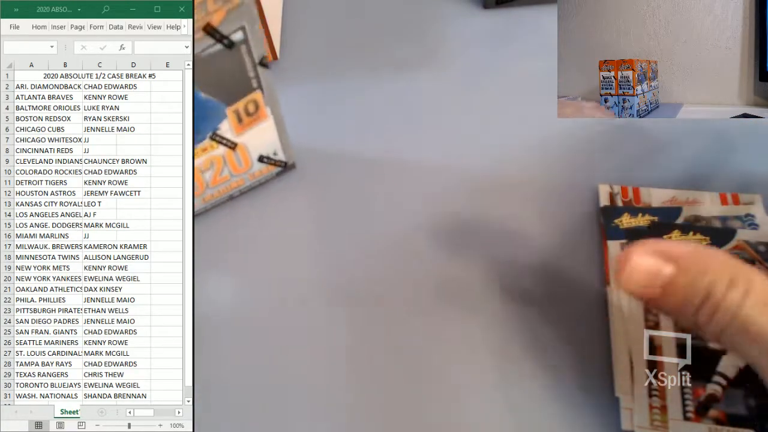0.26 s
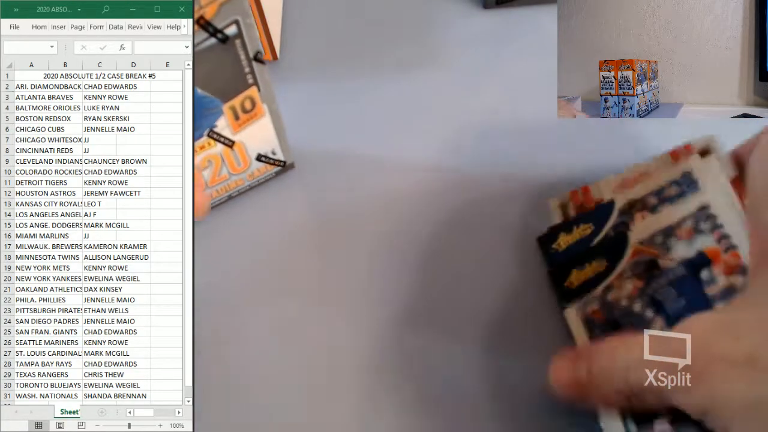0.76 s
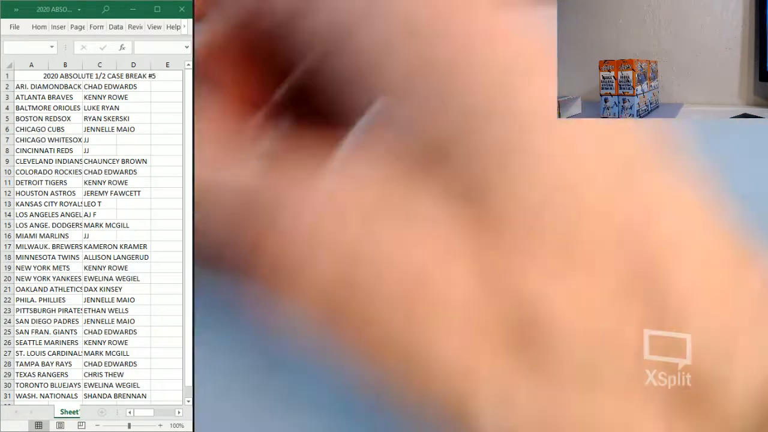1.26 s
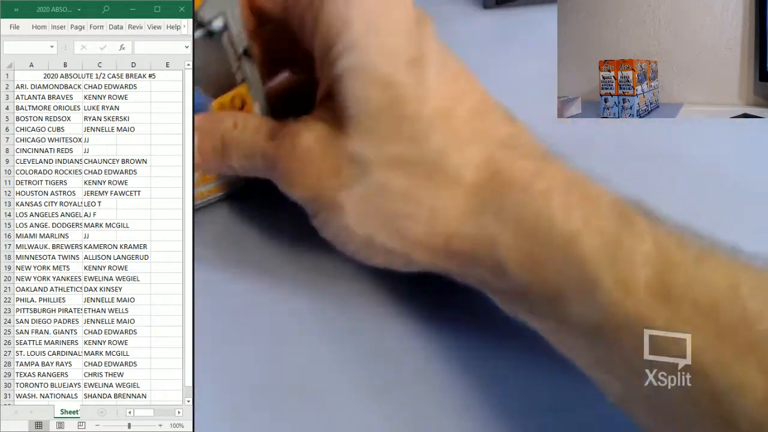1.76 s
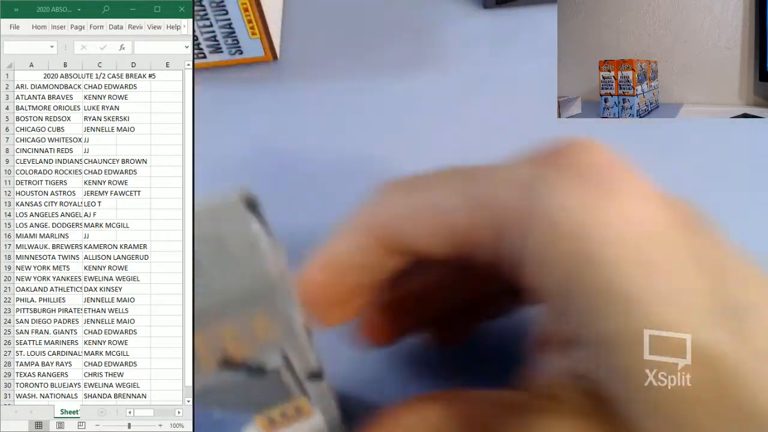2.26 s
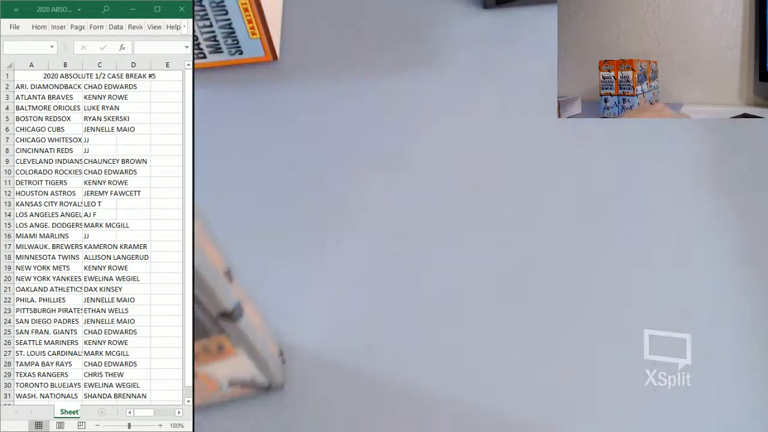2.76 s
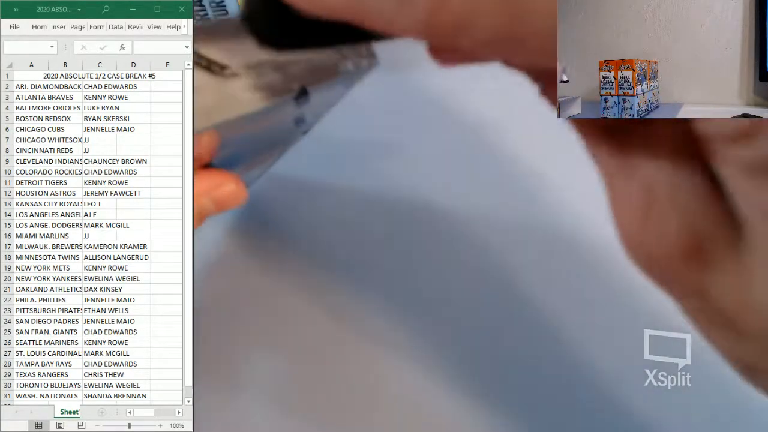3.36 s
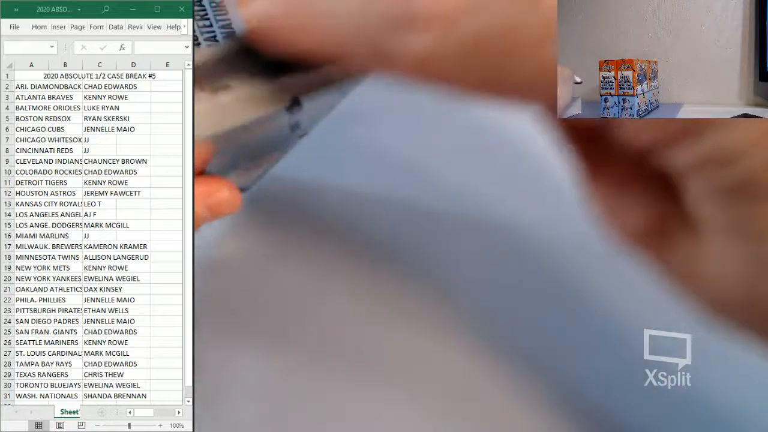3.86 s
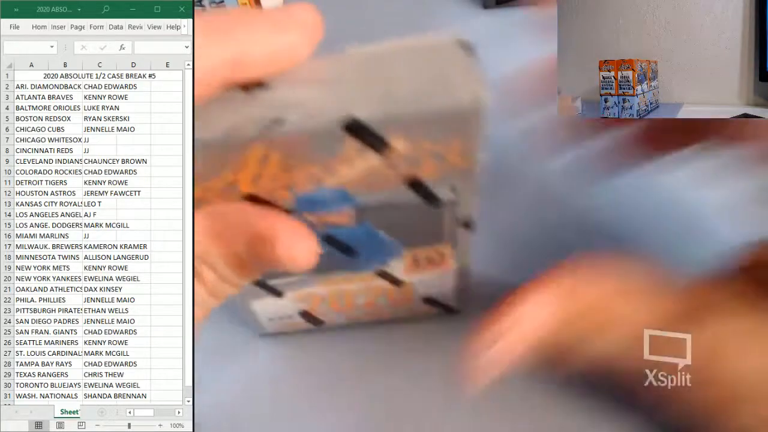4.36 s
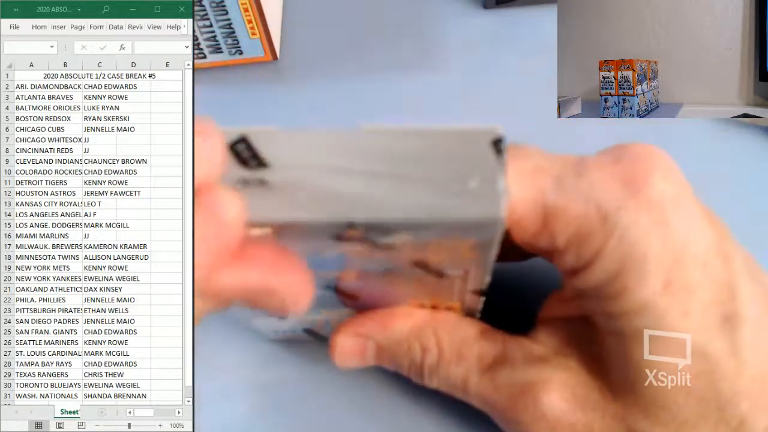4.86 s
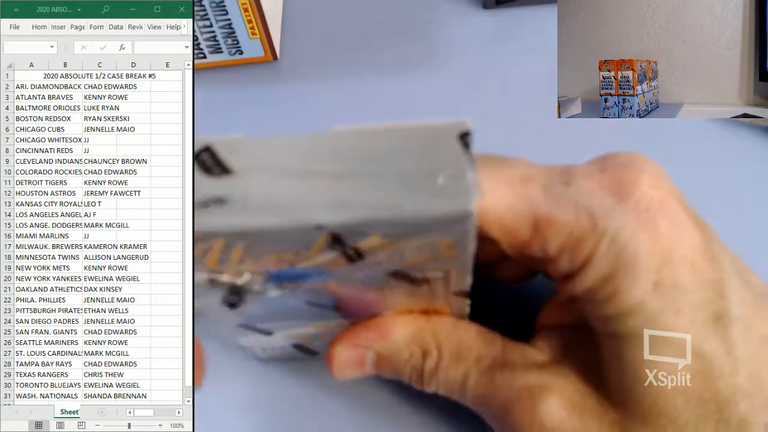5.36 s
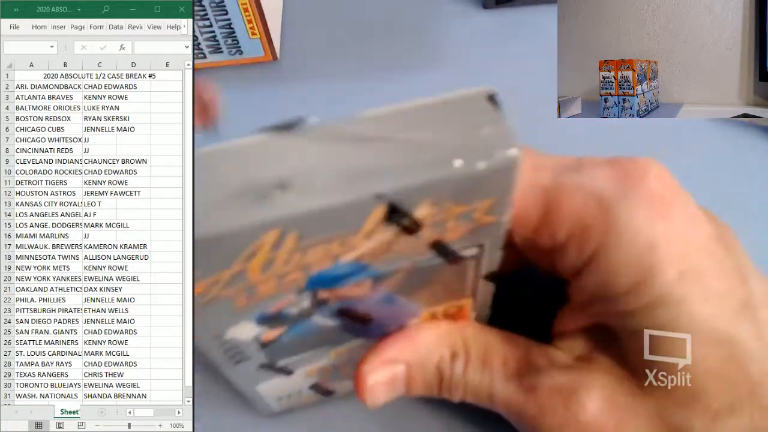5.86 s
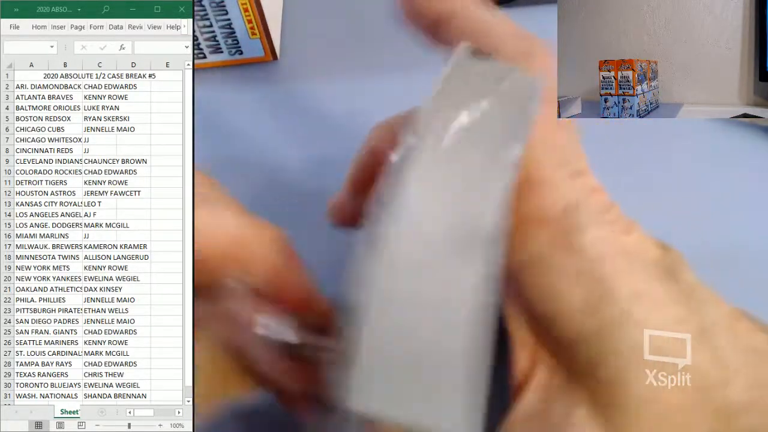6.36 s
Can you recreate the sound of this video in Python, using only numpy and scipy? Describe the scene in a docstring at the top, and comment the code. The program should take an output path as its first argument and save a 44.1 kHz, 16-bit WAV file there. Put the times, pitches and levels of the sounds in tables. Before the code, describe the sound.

Cards slide off a desk, then a small film-wrapped box is dragged, knocked hard once and turned with crinkly clicks over low fan noise.

```python
"""A desk in a small furnished room: hands slide a stack of cards off its top, then drag, knock and turn
a small film-wrapped cardboard box. Fan noise and mains hum lie behind. Knocks and stick-slip noise ring
the modes of the desk and box, sliding edges sing, and shaped noise bursts make the film click and rustle.
A narrow-band webcam microphone stands on the same desk and overloads on the hardest knock."""
import sys
import numpy as np
from scipy import signal
from scipy.fft import rfft, irfft
from scipy.io import wavfile
from scipy.ndimage import uniform_filter1d

SR = 44100
rng = np.random.default_rng(int(sys.argv[2]) if len(sys.argv) > 2 else 0)


def unload_wav(signal):
    """Save mono or channel-first audio to the path in sys.argv[1] as 16-bit WAV at rate SR, clipped to [-1, 1]."""
    wavfile.write(
        sys.argv[1],
        SR,
        np.round(np.clip(np.atleast_2d(signal).T, -1, 1) * 32767).astype(np.int16),
    )


def gain_from_decibels(decibels):
    """Convert decibel values to linear amplitude factors."""
    exponent = np.asarray(decibels, float) / 20
    return 10 ** exponent


N = 291501  # length in samples


def unit(x):
    """Scales a sound to rms 1."""
    return x / np.sqrt(np.mean(x ** 2))


def band(x, hz, width_hz):
    """Two-pole resonance, gain 1 at the centre."""
    return signal.lfilter(*signal.iirpeak(hz, hz / width_hz, fs=SR), x)


def colour(x, points):
    """Shapes a spectrum by (Hz, dB) points, joined straight over log frequency."""
    hz, db = np.transpose(points)
    f = np.maximum(np.fft.rfftfreq(len(x), 1 / SR), 1)
    return irfft(rfft(x) * gain_from_decibels(np.interp(np.log(f), np.log(hz), db)), len(x))


def walk(rate):
    """Random levels, each held for 1 / rate seconds and slewed twice; rms 1."""
    hold = int(SR / rate)
    levels = np.repeat(rng.standard_normal(N // hold + 1), hold)
    return unit(uniform_filter1d(uniform_filter1d(levels, hold), hold)[:N])


def grit(rate, scatter_db, smooth):
    """Slips at random moments, rate per second, with a long-tailed size, over an even hiss."""
    chance = rng.random((2, N))
    size = gain_from_decibels(-scatter_db * np.log(1 - chance[1])) * rng.standard_normal(N)
    slips = (chance[0] < rate / SR) * size
    return unit(unit(slips) + smooth * rng.standard_normal(N))


def add(out, s, peak_db, sound):
    """Lays a sound in at time s with the given peak."""
    i = int(s * SR)
    out[i:i + len(sound)] += (sound * gain_from_decibels(peak_db) / np.abs(sound).max())[:N - i]


# Spectrum of the fan noise in the room. Each row: frequency in Hz, relative level in dB per Hz.
AIR_SPECTRUM = [(12, -52.5), (20, 6), (120, -3.5), (185, -1.5), (239, 2.5), (300, -8.5), (430, -9.5),
                (555, -24), (615, -14.5), (2320, -30), (5540, -32), (7720, -37.5), (9000, -35.5),
                (11700, -100), (19800, -120)]
# Mains hum. Each row: frequency in Hz, middle level in dB rms.
HUM_TONES = [(59.2, -57), (118.4, -54.5), (242.2, -73)]


def room_tone():
    """Fan noise that drifts a little in level, and a mains hum that wavers."""
    t = np.arange(N) / SR
    air = unit(colour(rng.standard_normal(N), AIR_SPECTRUM)) * gain_from_decibels(-54 + 0.87 * walk(25))
    hum = np.zeros(N)
    for hz, db in HUM_TONES:
        hum += np.sqrt(2) * gain_from_decibels(db + 1.4 * walk(56)) * np.sin(2 * np.pi * hz * t)
    return air + hum


def sampling_tone():
    """A faint 8 kHz tone gated in quick beats with softened edges, left by sampling at 16 kHz."""
    t = np.arange(N) / SR
    beats_per_s, on_share = 30, 0.33
    gate = uniform_filter1d(1. * (t * beats_per_s % 1 < on_share), size=100)
    return np.sqrt(2) * gain_from_decibels(-84) * np.sin(2 * np.pi * 8000 * t) * gate


# Thin bright ticks that bypass the microphone's treble limit. Each row: start in seconds, peak in dB.
BRIGHT_TICKS = [(4.189, -39), (4.8247, -40), (5.102, -43), (5.3273, -27)]


def ticks():
    """Each tick is one impulse through three broad resonances between 5.5 and 5.7 kHz."""
    out = np.zeros(N)
    impulse = 1. * (np.arange(SR // 200) == 0)
    spike = band(band(band(impulse, 5700, 3000), 5500, 4050), 5700, 6000)
    for s, peak_db in BRIGHT_TICKS:
        add(out, s, peak_db, spike)
    return out


# Strokes of the hand across the desk. Each row: start in seconds, length in seconds, desk drag in dB,
# card scrape in dB, scrape centre in Hz, film rustle in dB; levels are at full speed, before settling.
HAND_STROKES = [(-.06, 0.07, -41.5, -42, 950, -52.5), (0.02, 0.2, -56, -69, 1476, -63),
                (0.259, 0.088, -34.5, -43, 890, -52.5), (0.318, 0.16, -32, -48, 860, -59.5),
                (0.455, 0.13, -49.5, -51, 1117, -64.5), (0.556, 0.24, -54.5, -55.5, 1300, -61.5),
                (0.98, 0.3, -77, -70, 1210, -67.5), (1.389, 0.16, -47.5, -65.5, 822, -70),
                (1.582, 0.13, -53.5, -59.5, 1000, -67.5), (1.913, 0.2, -57, -65.5, 1180, -64),
                (2.036, 0.25, -45, -55.5, 1250, -68), (2.211, 0.22, -47, -50.5, 1000, -64.5),
                (2.4, 0.32, -54.5, -61, 1100, -60), (2.627, 0.028, -32, -64.5, 1536, -32),
                (2.67, 0.18, -45, -51.5, 1014, -63), (2.775, 0.2, -42, -52.5, 727, -69),
                (3.019, 0.078, -46, -60.5, 897, -65), (3.306, .16, -39, -39.5, 1250, -43),
                (3.711, 0.12, -44, -39, 1100, -42.5), (3.733, 0.14, -37, -42, 1547, -37),
                (3.898, 0.047, -40, -40, 1255, -67), (4.046, 0.12, -22.5, -30.5, 1200, -46.5),
                (4.079, 0.18, -33, -41.5, 988, -65), (4.247, 0.33, -53.5, -59, 1100, -62.5),
                (4.545, 0.2, -52, -61, 1544, -63), (4.685, 0.45, -57.5, -63, 1100, -69.5),
                (4.978, 0.63, -71, -64, 1100, -62.5), (5.261, 0.072, -42, -44, 1220, -40),
                (5.352, 0.077, -36, -38.5, 790, -43.5), (5.474, 0.093, -37.5, -46, 930, -50.5),
                (5.576, 0.039, -37.5, -36.5, 1100, -38), (5.666, 0.11, -50, -49.5, 1000, -57),
                (5.761, 0.16, -50.5, -54.5, 1218, -50.5), (5.98, 0.16, -52, -60, 807, -65),
                (6.146, 0.33, -46, -50, 960, -55), (6.281, 0.053, -40, -44, 892, -62),
                (6.373, 0.57, -53, -56, 1200, -55.5)]
# Levels while the hands only hold: drag, scrape and film, each in dB.
HOLD_DB = [-61.5, -70.5, -86.5]


def strokes():
    """Hand speed follows a half sine over each stroke; every layer follows it and settles after."""
    speed_power = 0.87  # amplitude against hand speed
    settle_s = 0.014
    rest_hz = 1100  # scrape centre while the hands rest
    t = np.arange(N) / SR
    power = gain_from_decibels(np.array(HOLD_DB))[:, None] ** 2 * np.ones(N)
    # the fourth row is the scrape centre in octaves, weighted by scrape power
    power = np.vstack([power, power[1] * np.log2(rest_hz)])
    for s, length, drag_db, scrape_db, hz, film_db in HAND_STROKES:
        i, j = max(int(s * SR), 0), min(int((s + length) * SR), N)
        speed = np.abs(np.sin(np.pi * (t[i:j] - s) / length))
        full = gain_from_decibels(np.array([drag_db, scrape_db, film_db]))[:, None]
        own = (full * speed ** speed_power) ** 2
        power[:, i:j] += np.vstack([own, own[1] * np.log2(hz)])
    keep = np.exp(-1 / (settle_s * SR))
    power = signal.lfilter([1 - keep], [1, -keep], power, zi=keep * power[:, :1])[0]
    drag_db, scrape_db, film_db = 10 * np.log10(power[:3])
    # where strokes overlap the louder one weighs more on the centre
    return drag_db, scrape_db, film_db, power[3] / power[1]


# Modes of the desk top and box, rung by both rubbing and knocks.
# Each row: frequency in Hz, base level in dB, base decay time (t60) in seconds.
DESK_MODES = [(43.6, -1, 0.37), (68.5, 2.5, 0.17), (122.4, 3.5, 0.18), (199.7, 7, 0.053), (195, -9, 0.022),
              (227.6, -11, 0.96), (316, -2, 0.11), (353.4, 0, 0.14), (430, 6, 0.063), (504, -2.5, 0.14),
              (590, -1, 0.05), (668, 4.5, 0.027), (813, -1, 0.024), (885, 1, 0.029), (1000, -9.5, 0.022),
              (1085, -8.5, 0.058), (1140, -19.5, 0.076), (1392, -0.5, 0.013), (1520, -21, 0.11),
              (1900, -37.5, 0.19)]
# Spectrum of the rustling film. Each row: frequency in Hz, relative level in dB per Hz.
FILM_SPECTRUM = [(1290, -14), (2200, 0), (3010, -1), (3940, -1.5), (4210, -4), (6140, -3.5), (7860, -16),
                 (9000, -4.5), (11700, -68), (19800, -120)]


def rubbing():
    """Stick-slip drives the desk: drags its low modes, card edges the upper ones; film rustles on top."""
    drag_db, scrape_db, film_db, centre_octave = strokes()
    drag_slips, scrape_slips, film_slips = grit(2000, 1.5, .8), grit(1500, 1.5, .8), grit(1200, 2.5, .8)
    edge_hz = 560  # drags ring the modes below, card edges those above
    wander_db = 2.2
    low_ring, high_ring = np.zeros(N), np.zeros(N)
    for hz, db, t60 in DESK_MODES:
        # the contact wanders, so each mode swells and fades by itself
        level = gain_from_decibels(db + wander_db * walk(24))
        width_hz = 1.16 * np.log(1000) / np.pi / t60
        if hz > edge_hz:
            high_ring += level * band(scrape_slips, hz, width_hz)
        else:
            low_ring += level * band(drag_slips, hz, width_hz)
    # a soft, broad contact carries no treble into the wood
    drag = band(band(low_ring, 420, 740), 260, 660)
    wood = unit(high_ring) + gain_from_decibels(-19.5) * unit(band(scrape_slips, 1000, 900))
    # a flat face slides dull, an edge bright: each stroke favours the modes near its centre
    scrape = np.zeros(N)
    for hz in 500 * 2 ** np.arange(0, 2.6, 1 / 3):
        near = gain_from_decibels(-15 * (np.log2(hz) - centre_octave) ** 2)  # 15 dB down one octave away
        scrape += near * band(band(wood, hz, hz / 3), hz, hz / 3)
    rustle = colour(film_slips, FILM_SPECTRUM) * gain_from_decibels(wander_db * walk(65))
    # creases come and go, so the colour of the film is patchy
    film = np.zeros(N)
    for hz in 1500 * 2 ** np.arange(0, 2.8, 1 / 3):
        film += gain_from_decibels(wander_db * walk(45)) * band(band(rustle, hz, hz / 2), hz, hz / 2)
    return gain_from_decibels(drag_db) * unit(drag) + gain_from_decibels(scrape_db) * unit(scrape) + gain_from_decibels(film_db) * unit(film)


# Narrow resonances that sing while an edge slides. Each row: start in seconds, length in seconds,
# first pitch in Hz, last pitch in Hz, level in dB rms before the swell and fade.
SINGING_EDGES = [(0.269, 0.11, 433.6, 430, -33), (.28, 0.15, 1080, 1035, -42),
                 (0.481, .08, 1100, 1000, -48.5), (2.744, 0.22, 610, 745, -49),
                 (3.315, 0.14, 6440, 7100, -50.5), (3.354, .1, 1350, 1467, -39),
                 (3.739, 0.092, 5820, 6220, -43.5), (3.77, 0.04, 3920, 3900, -53),
                 (3.749, .08, 1552, 1579, -36.5), (3.892, 0.077, 1000, 784, -42.5),
                 (4.09, 0.055, 3925, 3810, -39)]


def sings():
    """Narrow noise on a gliding pitch, swelling and fading over the slide."""
    width = 0.031  # bandwidth as a share of the first pitch
    out = np.zeros(N)
    noises = rng.standard_normal((len(SINGING_EDGES), 2, SR // 3))
    for (s, length, first_hz, last_hz, db), noise in zip(SINGING_EDGES, noises):
        n, i = int(length * SR), int(s * SR)
        lowpass = signal.butter(1, width * first_hz / 2, fs=SR)
        slow = signal.lfilter(*lowpass, noise[0] + 1j * noise[1])[-n:]
        phase = 2 * np.pi * np.cumsum(np.linspace(first_hz, last_hz, n)) / SR
        tone = unit((slow * np.exp(1j * phase)).real)
        out[i:i + n] += gain_from_decibels(db) * tone * np.sin(np.pi * np.arange(n) / n)
    return out


# Snaps of film and card edges. Each row: start in seconds, peak in dB, centre in Hz.
SNAPS = [(0.192, -41.5, 5950), (0.2734, -37.5, 2340), (1.037, -41, 2170), (1.369, -40.5, 7010),
         (1.956, -42.5, 2420), (1.9892, -36, 3270), (2.14, -35, 2010), (2.6414, -16, 6300),
         (2.648, -23.5, 3500), (2.6528, -21, 3040), (2.657, -20, 2800), (2.667, -37, 4000),
         (2.756, -31, 3280), (2.817, -41.5, 2960), (3.3006, -20, 6400), (3.6295, -38, 2280),
         (3.709, -15, 5840), (3.8319, -12.5, 5430), (4.0528, -10.5, 4820), (4.0856, 0.5, 2080),
         (4.073, -17.5, 2000), (4.179, -28, 6000), (4.1899, -12.5, 4270), (4.222, -28.5, 5500),
         (4.414, -42.5, 4800), (4.45, -36.5, 2980), (4.606, -31.5, 1900), (4.746, -41.5, 2450),
         (4.8251, -39, 6100), (4.846, -38, 1500), (4.995, -42, 4800), (5.004, -43, 3500),
         (5.167, -41, 2350), (5.2018, -29, 4060), (5.2812, -16, 5830), (5.288, -27, 6900),
         (5.3348, -27, 4500), (5.3832, -14.5, 5070), (5.498, -31, 2380), (5.525, -28, 7000),
         (5.5346, -19.5, 2620), (5.5866, -12.5, 4850), (5.6774, -31, 2150), (5.691, -41, 5500),
         (5.744, -35, 2260), (5.819, -41, 2160), (5.847, -28.5, 3850), (5.8967, -35.5, 5280),
         (6.2869, -34.5, 1580), (6.305, -34, 6740), (6.421, -42, 2200), (6.5793, -27.5, 3300)]


def clicks():
    """A sharp crack with some body from the card beneath, then the film settles in a short fading hiss."""
    out, t = np.zeros(N), np.arange(SR // 8) / SR
    for (s, peak_db, hz), noise in zip(SNAPS, rng.standard_normal((len(SNAPS), SR // 8))):
        settling = noise * (np.exp(-t / 0.0019) + gain_from_decibels(-15.5) * np.exp(-t / 0.011))
        burst = gain_from_decibels(10.0) * (t == 0) + settling
        crack = band(band(burst, hz, 0.5 * hz), hz, 0.74 * hz)
        fizz = gain_from_decibels(-7) * band(band(burst, hz, 1.4 * hz), hz, 3.0 * hz)
        # the higher the snap, the less body
        body = gain_from_decibels(7 - 3.1 * np.log2(hz / 2000)) * band(band(burst, 1200, 1600), 1300, 2200)
        add(out, s, peak_db, crack + fizz + body)
    return out


# Knocks on the desk. Each row: start in seconds, peak in dB before the final bass cut,
# strongest pitch in Hz, gain of the leg modes (thud) in dB, spread around the pitch in octaves.
DESK_KNOCKS = [(0.245, -21, 225, -5.5, 0.67), (0.273, -20, 293, -16, 0.8), (1.481, -23, 254, -9, 0.48),
               (1.988, -29.5, 625, -10, 0.2), (2.071, -20, 427, -4.5, 0.35), (2.139, -17.5, 218, -2, 1.46),
               (2.414, -25, 430, -1, 0.47), (2.62, -9.5, 204, -8, 0.44), (3.297, -19, 1080, -19.5, 0.073),
               (3.402, -15.5, 1490, -23, 0.17), (3.435, -19, 950, -13.5, 0.41),
               (3.707, -20, 1086, -16, 0.17), (3.831, -27, 288, -19.5, 0.19), (4.054, -14, 504, -27, 0.36),
               (4.075, -15.5, 498, -15, 0.17), (4.0844, 9.5, 784, -24.5, 3), (4.189, -13.5, 404, -12, 0.64),
               (4.449, -31, 477, -12, 1.9), (4.513, -33, 300, -6, 0.74), (4.851, -29.5, 290, -2, 1.9),
               (5.023, -34, 350, -6, 1.1), (5.248, -29.5, 200, 12, 0.18), (5.28, -14.5, 257, 2.5, 1.5),
               (5.358, -18.5, 460, -28, 0.64), (5.386, -17, 710, -14, 0.17), (5.504, -21.5, 607, -18, 0.17),
               (5.523, -23.5, 640, 1, 0.33), (5.588, -17.5, 497, -5, 1.1), (5.601, -23, 308, -5, 0.39),
               (5.703, -24.5, 800, -9, 0.8), (5.85, -24, 153, -2.5, 1.06), (6.024, -26.5, 353, -4.5, 0.63),
               (6.285, -15.5, 430, -6, 0.62), (6.539, -36, 202, 4, .6), (6.575, -35.5, 159, 1, 1.2)]


def knocks():
    """Each blow wakes the modes near its strongest pitch; the spot struck scatters their shares."""
    out, t = np.zeros(N), np.arange(SR // 3) / SR
    hz, db, t60 = np.transpose(DESK_MODES)[:, :, None]
    chance = rng.standard_normal((len(DESK_KNOCKS), 2, len(DESK_MODES), 1))
    rattle = rng.standard_normal((len(DESK_KNOCKS), SR // 3))
    detune, scatter_db = .012, 2.0
    legs = hz[:, 0] < 140
    bass_cut = signal.butter(2, 110, "high", fs=SR)
    for (s, peak_db, top_hz, thud_db, spread), (share, tune), noise in zip(DESK_KNOCKS, chance, rattle):
        near_db = db - 6 * np.abs(np.log2(hz / top_hz)) / max(spread, .2) + scatter_db * share
        # the whole desk rocks on its legs by the weight behind the blow
        near_db = np.where(legs[:, None], db + thud_db, near_db)
        # high-pitched taps come from thin card, which rings more briefly
        fade = np.exp(-np.log(1000) * t * (1 / t60 + top_hz / 120))
        modes = -gain_from_decibels(near_db) * np.sin(2 * np.pi * hz * (1 + detune * tune) * t) * fade
        # the bending modes shift no air as a whole, so they leave the bass to the legs
        ring = modes[legs].sum(axis=0) + signal.lfilter(*bass_cut, modes[~legs].sum(axis=0))
        # cardboard lands unevenly: a blow, then a few ms of chatter
        contact = (t == 0) + gain_from_decibels(-21.5) * noise * np.exp(-t / 0.011)
        # a dull blow is a soft, longer push
        push = np.hanning(int(0.4 * SR / top_hz / 2 ** spread) + 3)
        contact = np.convolve(contact, push)
        add(out, s, peak_db, signal.fftconvolve(ring, contact)[:len(t)])
    # the knocks carry little below 50 Hz
    return signal.lfilter(*signal.butter(2, 50, "high", fs=SR), out)


def room(near):
    """Adds an echo off the nearest wall and the diffuse tail of a small furnished room."""
    t60_s, echo_s = 0.3, 0.0092
    t = np.arange(SR // 2) / SR
    tail = rng.standard_normal(len(t)) * np.exp(-np.log(1000) * t / t60_s) * (t > .004)
    lag = int(echo_s * SR)
    near = near + gain_from_decibels(-14) * band(np.pad(near, (lag, 0))[:N], 4500, 4700)
    wet = signal.fftconvolve(near, tail / np.sqrt(np.sum(tail ** 2)))[:N]
    return near + gain_from_decibels(-13.5) * wet


def scene():
    """Everything done on the desk, heard in the room, over the fan and hum."""
    near = knocks() + clicks() + rubbing() + sings()
    return (room(near) + room_tone())[None]


def microphone(x):
    """The webcam microphone on the desk passes little above 7550 Hz."""
    return signal.sosfilt(signal.ellip(6, .5, 65, 7550, fs=SR, output="sos"), x)


def overload(x):
    """The stage after the microphone flattens peaks toward a ceiling and so splashes treble."""
    ceiling = .72
    flat = x / (1 + (x / ceiling) ** 8) ** (1 / 8)
    flat = signal.lfilter(*signal.butter(1, 12, "high", fs=SR), flat)
    return signal.sosfilt(signal.butter(10, 16200, fs=SR, output="sos"), flat)


def roll_off(x):
    """The treble ends steeply here."""
    return signal.sosfilt(signal.butter(12, 16810, fs=SR, output="sos"), x)


def record(dry):
    """The microphone's signal, with ticks and the faint pulsing 8 kHz sampling tone, is overloaded."""
    mix = overload(microphone(dry) + ticks() + sampling_tone())
    return roll_off(mix)


dry = scene()
out = record(dry)
unload_wav(out)
```